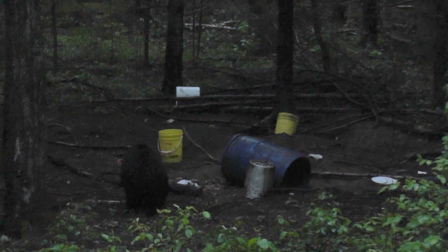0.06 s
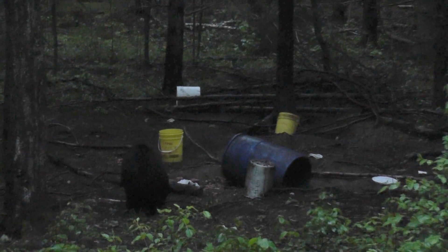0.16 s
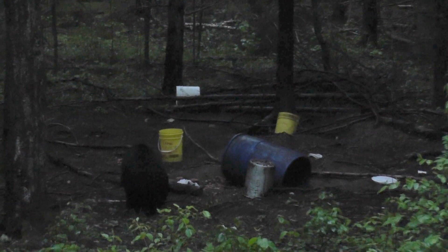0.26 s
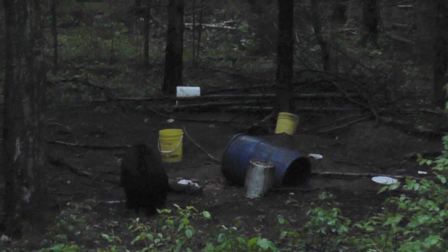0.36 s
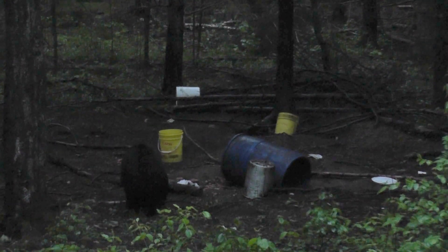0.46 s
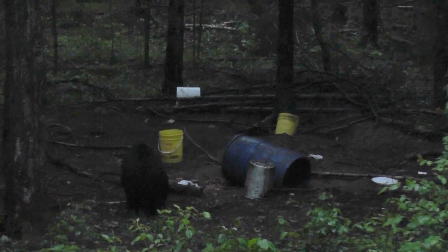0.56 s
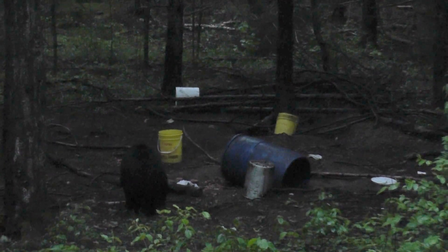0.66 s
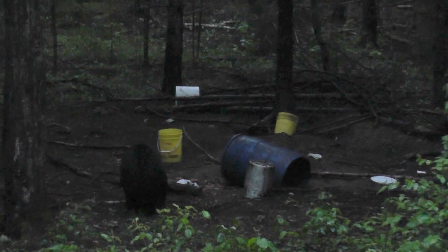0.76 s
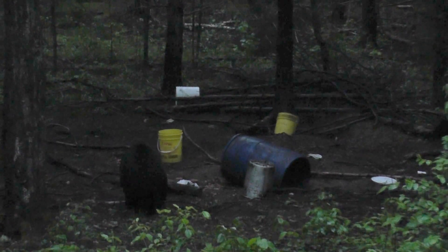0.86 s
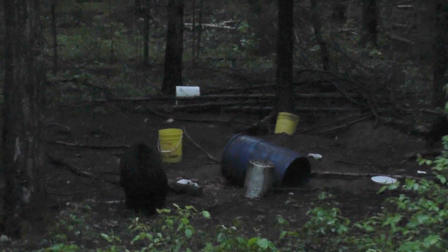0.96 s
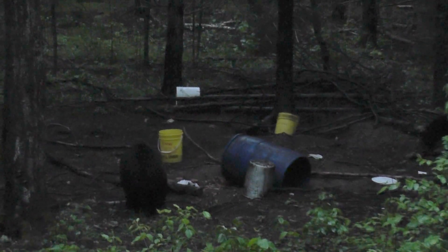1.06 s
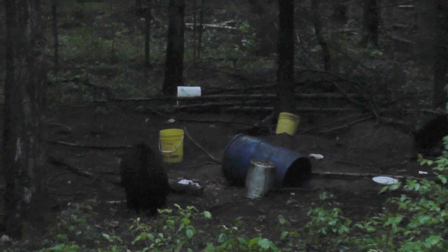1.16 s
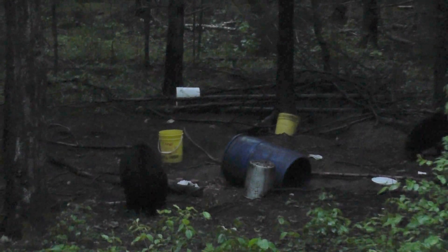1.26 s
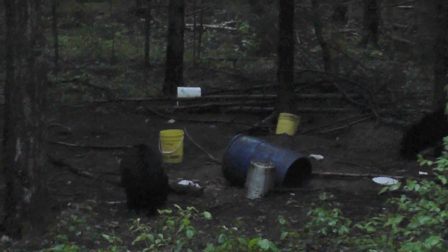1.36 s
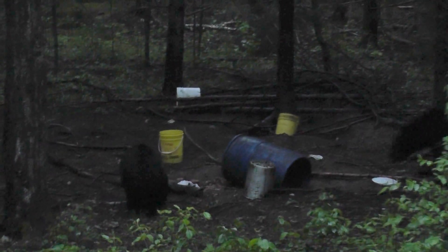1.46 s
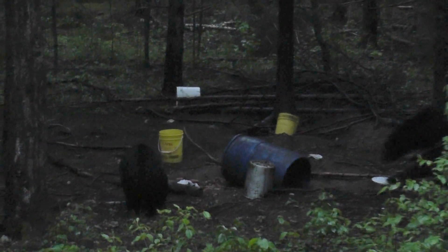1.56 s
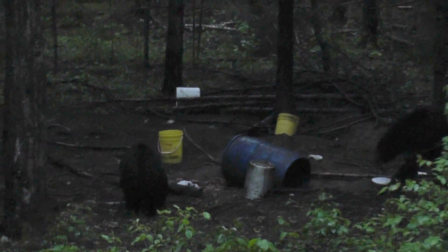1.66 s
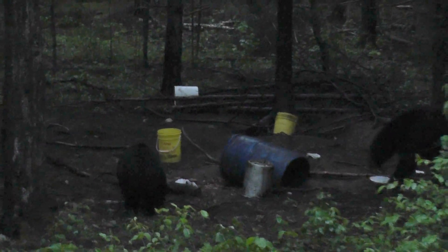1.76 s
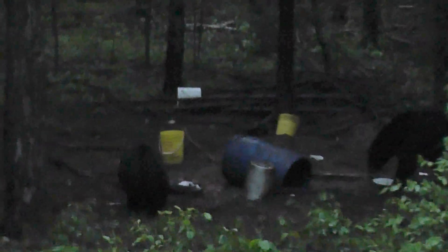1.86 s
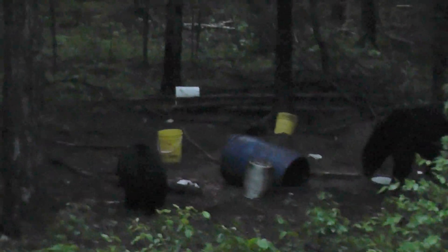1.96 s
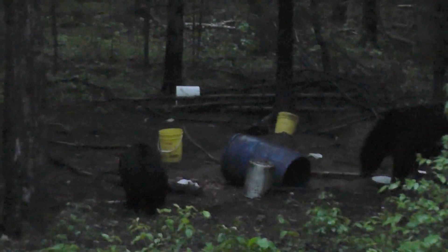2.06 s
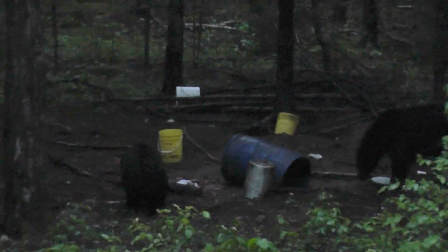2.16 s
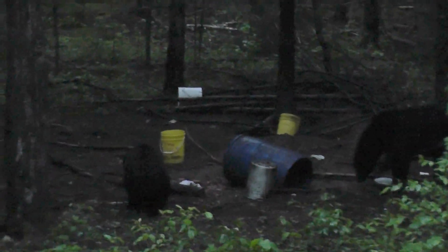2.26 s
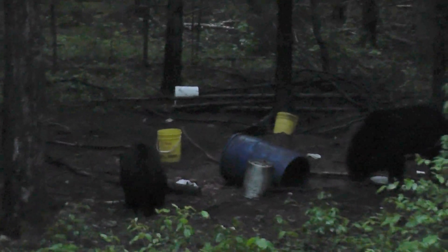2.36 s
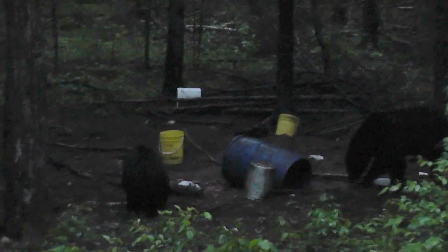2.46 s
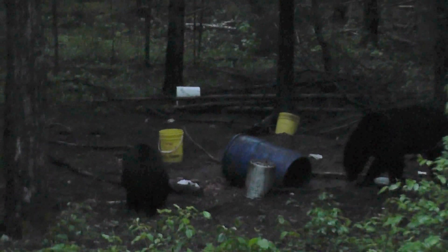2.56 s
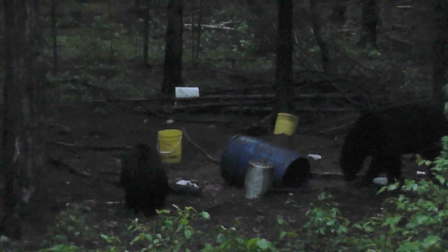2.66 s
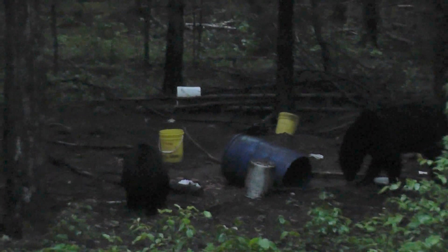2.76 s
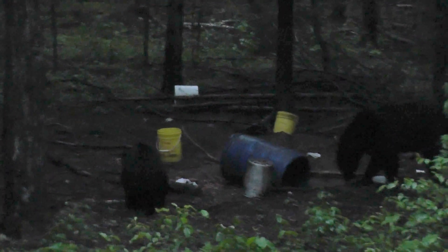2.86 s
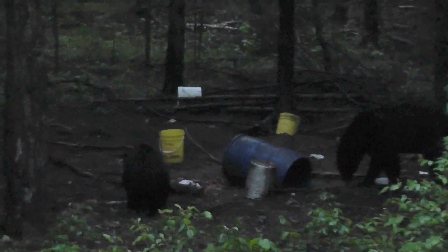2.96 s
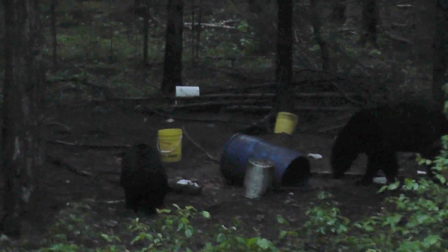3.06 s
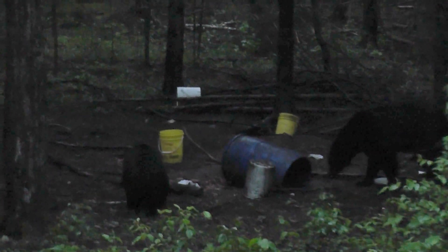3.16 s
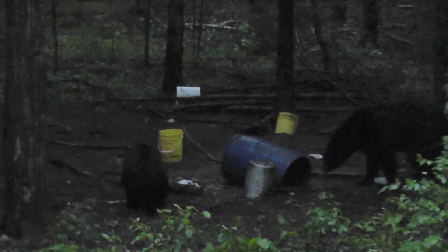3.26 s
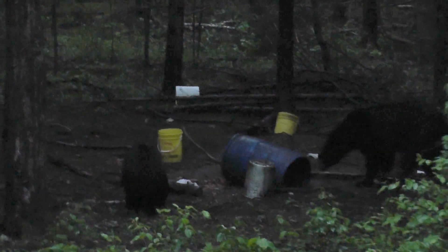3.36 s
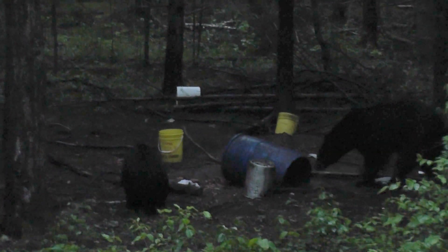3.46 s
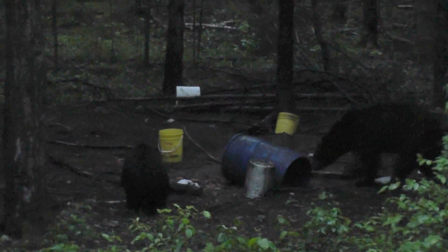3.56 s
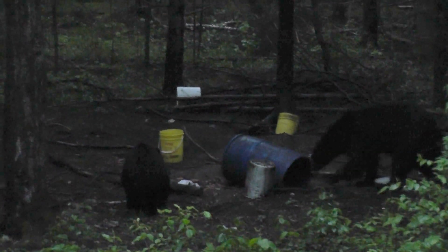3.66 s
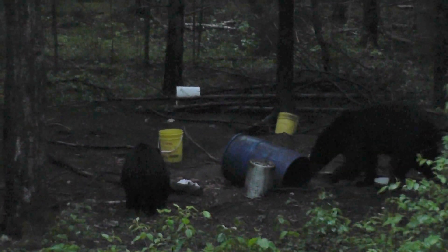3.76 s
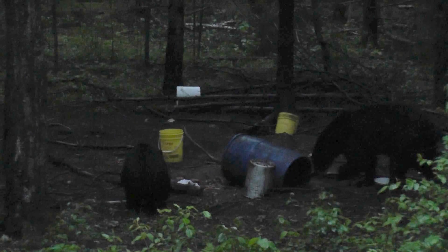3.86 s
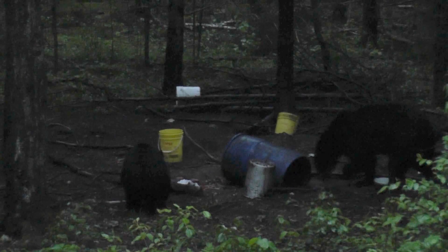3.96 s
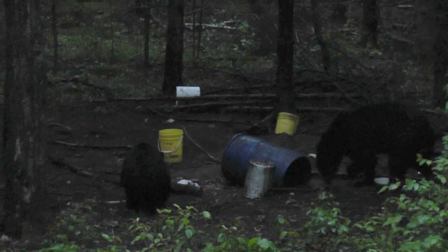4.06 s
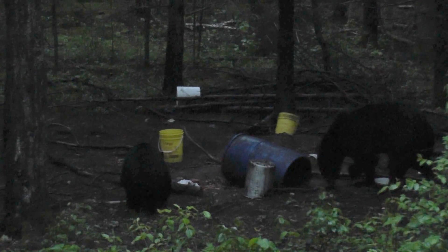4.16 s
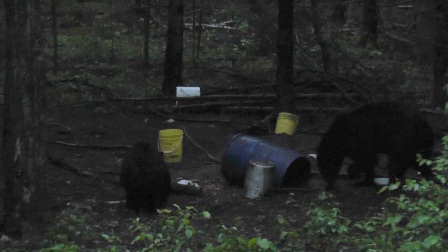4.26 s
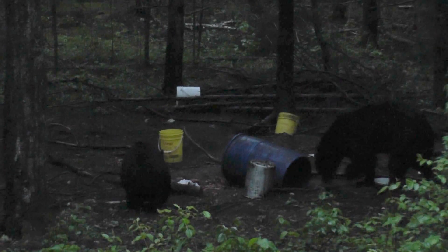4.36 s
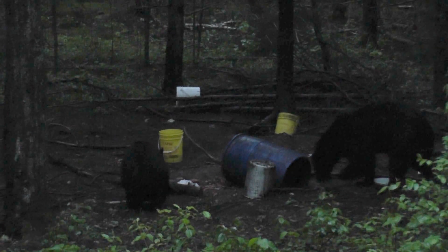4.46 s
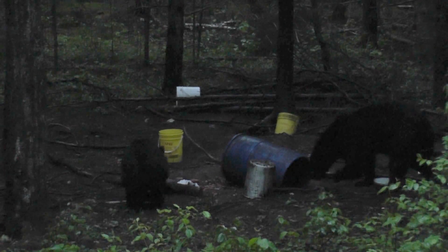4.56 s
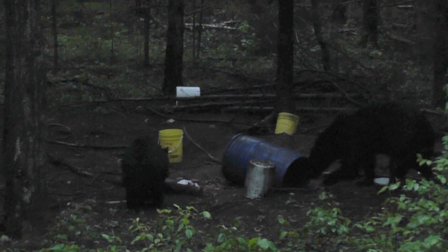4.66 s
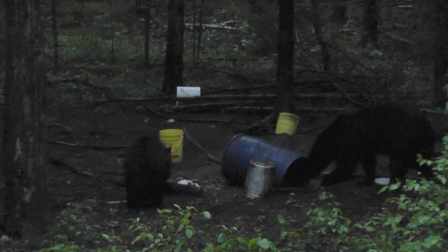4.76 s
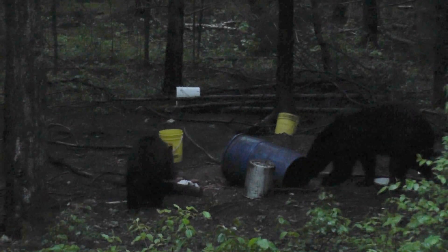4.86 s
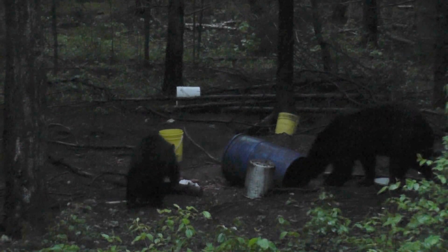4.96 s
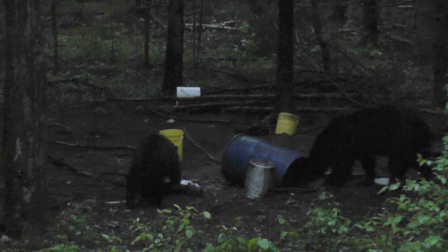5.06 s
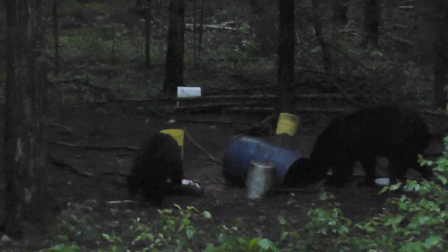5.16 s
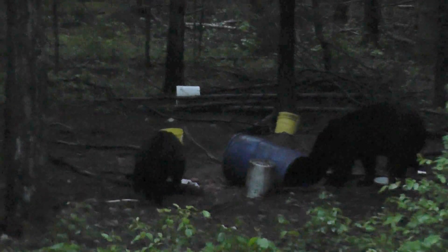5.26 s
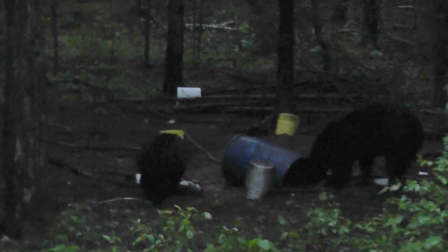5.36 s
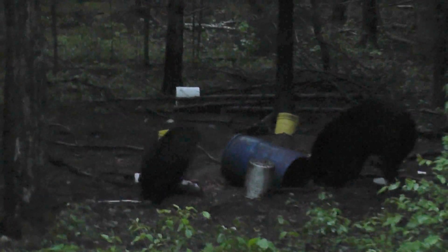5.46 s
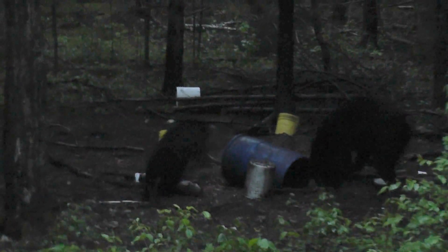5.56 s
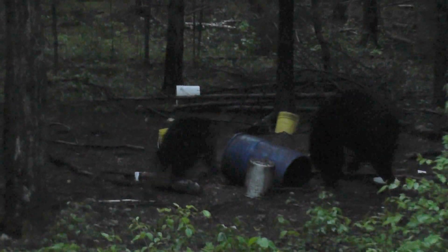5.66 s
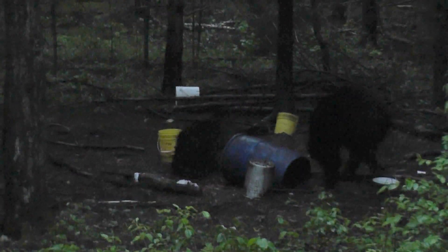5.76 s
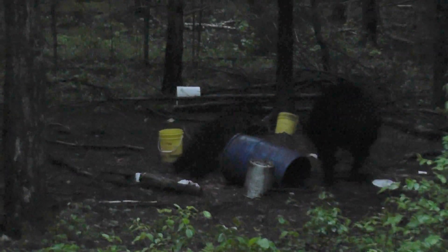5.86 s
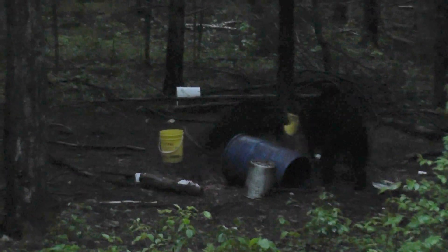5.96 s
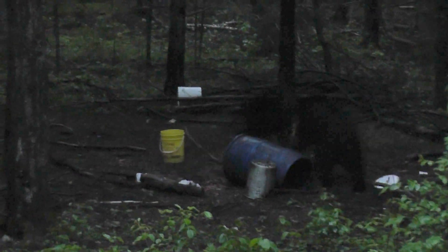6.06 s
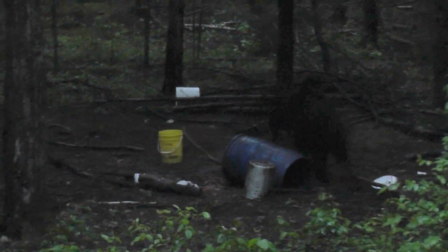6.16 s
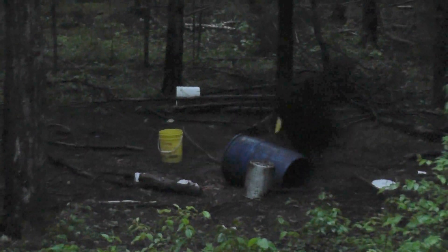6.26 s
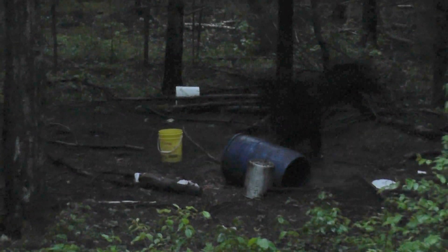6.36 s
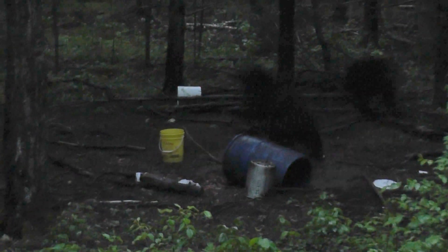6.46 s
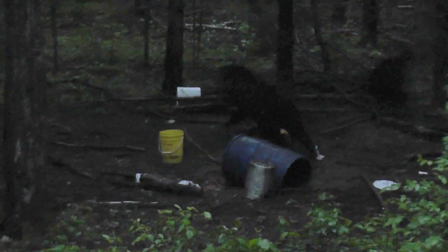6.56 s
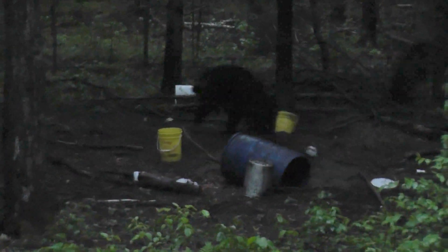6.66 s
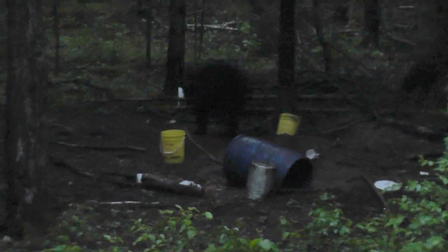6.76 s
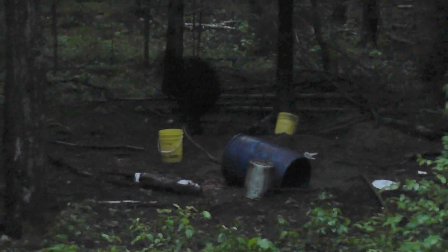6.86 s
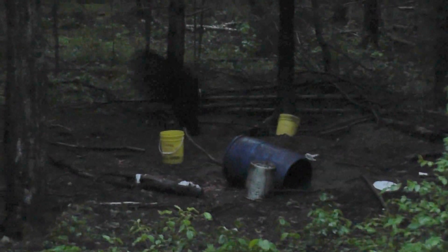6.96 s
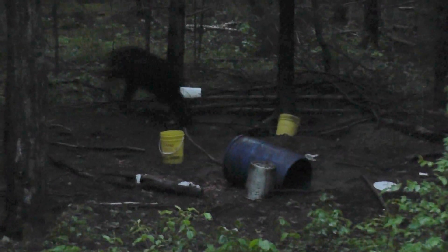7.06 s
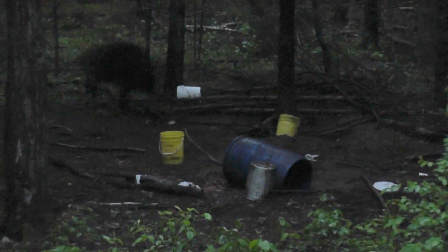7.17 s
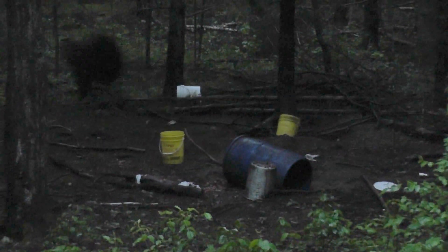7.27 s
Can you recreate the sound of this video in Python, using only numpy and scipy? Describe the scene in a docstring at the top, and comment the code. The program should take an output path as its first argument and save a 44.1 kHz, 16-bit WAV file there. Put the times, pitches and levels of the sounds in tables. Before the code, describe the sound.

For five seconds the forest is hushed, with drips on leaves, soft plant rustles, light wooden clacks and a low engine drone far off. A close bow shot breaks it with a short hiss and hard slam, followed by the arrow's smack. Paws pound and litter scuffs, a barrel thumps and booms, then a run of dry branch cracks rings through the woods until the end.

```python
"""A bow is shot from a hide in damp woods: a hiss, the slam of string and limbs, then the arrow's smack.
Bears bolt, bump a plastic barrel and break through brush and dead wood, while the trees answer.
Before that, drops tick on leaves and hide; under it all, leaves hiss and a far engine rises and falls.
Impacts are decaying noise and damped modes, rustles are grainy coloured noise, the engine is a sum of
harmonics, and the echoes of hide and woods are diffuse noise tails."""
import sys
import numpy as np
from scipy import signal
from scipy.fft import rfft, irfft, next_fast_len
from scipy.io import wavfile
from scipy.ndimage import map_coordinates

SR = 44100
rng = np.random.default_rng(int(sys.argv[2]) if len(sys.argv) > 2 else 0)


def dump(signal):
    """Clip the signal to [-1, 1] and save it as 16-bit WAV at the path in sys.argv[1]."""
    limited = np.clip(np.atleast_2d(signal).T, -1, 1)
    pcm = np.round(limited * 32767).astype(np.int16)
    wavfile.write(sys.argv[1], SR, pcm)


N = 322812

# reverberation inside the hide: (frequency [Hz], t60 [s])
HIDE_DECAY = [(150, 0.09), (600, 0.24), (1600, 0.26), (3000, 0.08), (8000, 0.18), (15000, 0.19)]
# reverberation among the trees: (frequency [Hz], t60 [s])
WOODS_DECAY = [(100, 0.099), (700, 1), (3000, 0.73), (8000, 0.65), (15000, 0.37)]
# spectrum of brushed twigs: (frequency [Hz], relative level [dB])
BRUSH_SPECTRUM = [(1350, -51), (2300, -13), (3620, -2.5), (4550, -18), (5140, -0.5), (5940, -4.5),
                  (7460, 5), (8430, 0.5), (12900, -21.5), (15000, -20), (16000, -31)]
# spectrum of rustling leaves: (frequency [Hz], relative level [dB])
LEAF_SPECTRUM = [(880, -9), (1500, 0), (2160, -16), (2590, -5), (3090, -6.5), (3880, -8), (4690, -13.5),
                 (7030, -4), (8000, -5.5), (10500, -19), (11800, -19.5), (14300, -24), (16000, -27)]
# spectrum of a drop's tick: (frequency [Hz], relative level [dB])
TICK_SPECTRUM = [(500, -16), (1500, -9), (3200, 0.5), (4700, -7.5), (7500, 2), (10500, -13.5), (16000, -37)]

TOP_HZ = 16000  # upper band limit
RUN_S = 5.4  # from here on the bears run


def amp(db):
    """Decibels as an amplitude factor."""
    return 10 ** (np.asarray(db) / 20)


def unit(x):
    """x scaled to an rms of 1."""
    return x / np.sqrt(np.mean(x ** 2) + 1e-20)


def along(points, hz):
    """Read (frequency [Hz], value) points on a log frequency axis."""
    f, v = np.transpose(points)
    return np.interp(np.log(hz + 1), np.log(f + 1), v)


def curves(rows):
    """One value per sample for each column after the time."""
    s, *cols = np.transpose(rows)
    return [np.interp(np.arange(N) / SR, s, c) for c in cols]


def wobble(rate):
    """A smooth random curve with rate knots a second."""
    knots = rng.standard_normal(int(N * rate / SR) + 4)
    return map_coordinates(knots, [np.arange(N) * rate / SR])


def swell(s, attack, hold, fall_db_per_s):
    """An envelope that rises from s seconds on, holds and dies away."""
    t = np.arange(N) / SR - s
    fall_db = -fall_db_per_s * np.maximum(t - attack - hold, 0)
    return np.clip(t / attack, 0, 1) * amp(fall_db)


def filtered(x, response):
    """x times a response of frequency."""
    m = next_fast_len(N + SR // 2)
    return irfft(rfft(x, m) * response(np.fft.rfftfreq(m, 1 / SR)), m)[..., :N]


def coloured(x, spectrum, size=2048):
    """x through a causal, minimum-phase filter of unit energy with the given spectrum."""
    level_db = np.maximum(along(spectrum, np.fft.rfftfreq(size, 1 / SR)), -90)
    cepstrum = irfft(np.log(amp(level_db)))
    # folding the cepstrum forward puts the filter's energy as early as possible
    cepstrum[1:size // 2] *= 2
    cepstrum[size // 2 + 1:] = 0
    kernel = irfft(np.exp(rfft(cepstrum)))
    return signal.fftconvolve(x, kernel / np.linalg.norm(kernel))[:N]


def spread(pair):
    """Two unrelated signals become left and right, as alike as diffuse sound is at the microphone."""
    # left-right likeness: (frequency [Hz], correlation [-1 to 1])
    likeness = [(50, .05), (100, 0.2), (160, 0.8), (400, 0.7), (1300, 0.8), (3500, 0.98), (8000, 0.94),
                (15000, 0.24)]

    def turn(hz):
        return np.arccos(np.clip(along(likeness, hz), -1, 1)) / 2

    mid, side = filtered(pair, lambda hz: np.array([np.cos(turn(hz)), np.sin(turn(hz))]))
    return np.array([mid + side, mid - side])


def rush(spectrum, grain_db, grain_rate):
    """Stereo noise of rms 1 that comes in grains of random size."""
    grains = rng.standard_normal((2, N)) * amp(grain_db * wobble(grain_rate))
    return unit(spread(filtered(grains, lambda hz: amp(along(spectrum, hz)))))


def fade(t60):
    """Half a second of exponential decay, 60 dB down after t60 seconds."""
    return np.exp(-np.log(1000) * np.arange(SR // 2) / SR / t60)


def burst(t60):
    """Noise that starts at once and dies away."""
    return rng.standard_normal(SR // 2) * fade(t60)


def ring(modes, scatter_db):
    """Damped sine modes, struck at slightly new strengths each time."""
    t = np.arange(SR // 2) / SR
    total = np.zeros(SR // 2)
    for hz, db, t60 in modes:
        strength = amp(db + scatter_db * rng.normal())
        total += strength * np.sin(2 * np.pi * hz * t) * fade(t60)
    return total


def add(track, s, sound):
    """Mix a sound into a track at s seconds."""
    part = track[round(s * SR):][:len(sound)]
    part += sound[:len(part)]


def echo(x, decay, delay):
    """A diffuse stereo tail in which each frequency dies at its own speed."""
    hz, t, z = signal.stft(rng.standard_normal((2, SR)), SR, nperseg=256)
    dying = z * np.exp(-np.log(1000) * t / along(decay, hz)[:, None])
    tail = signal.istft(dying, SR, nperseg=256)[1]
    late = np.pad(x, (int(delay * SR), 0))[None]
    return spread(signal.fftconvolve(late, tail / np.linalg.norm(tail[0]), axes=1)[:, :N])


def bow():
    """The arrow hisses over its rest, then the string slams to a stop and the limbs shudder."""
    # jolts of the bow: (time [s], crack level [dB], thud level [dB])
    jolts = [(5.1107, -19.5, -45), (5.1129, -18, -42), (5.1157, -13, -28), (5.1189, -33, -11),
             (5.1242, -23.5, -14.5), (5.131, -20.5, -23), (5.1373, -34, -22), (5.165, -40, -37)]
    # spectrum of hiss and crack: (frequency [Hz], relative level [dB])
    crack_spectrum = [(200, -18), (600, 5), (1000, -6), (1700, -3), (2250, -12), (2800, -5), (3800, -8),
                      (4600, -15.5), (5900, -4), (7800, -2.5), (10000, -14), (16000, -26)]
    # dull knock of the grip: (frequency [Hz], level [dB], t60 [s])
    grip_modes = [(253, -14, 0.0041), (520, -0.5, 0.0057), (890, -1, 0.0053)]
    # shuddering limbs: (frequency [Hz], level [dB], t60 [s])
    limb_modes = [(143.6, -13, 0.045), (275, -13.5, 0.081), (615, -3.5, 0.042), (584, -17, 0.13),
                  (785, -28, .13), (1370, -30, .14), (1560, -28, 0.11), (1660, -21, 0.14)]
    release_s, release_db, release_t60_s = 5.0946, -26, 0.14
    jolt_t60_s = 0.032
    string_stop_s = 5.1153
    rattle, body = np.zeros((2, N)), np.zeros(N)
    for channel in rattle:
        add(channel, release_s, amp(release_db) * burst(release_t60_s))
    for s, crack_db, thud_db in jolts:
        for channel in rattle:
            add(channel, s, amp(crack_db) * burst(jolt_t60_s))
        add(body, s, amp(thud_db) * ring(grip_modes, scatter_db=1))
    add(body, string_stop_s, amp(-11) * ring(limb_modes, scatter_db=1))
    crack = spread(np.array([coloured(channel, crack_spectrum) for channel in rattle]))
    shot = crack + coloured(body, [(50, -25), (170, -2)])
    # the hide's cloth returns the crack with a lift in the lows and around 1.6 kHz
    returned = coloured(crack[0], [(150, 12), (600, 2.0), (1600, 7.0), (2600, 2.5), (8000, -5)])
    right_of_centre = amp([[-3.2], [2.3]])
    near = shot * right_of_centre + amp(-11.5) * echo(returned, HIDE_DECAY, delay=0.02)
    return near + amp(-20) * echo(crack[0], WOODS_DECAY, delay=0.037)


def arrow():
    """The arrow's hard smack and rattle are noise bursts; trees and hide return them, the hide brightly."""
    # strike and rattles: (time [s], level [dB], t60 [s])
    hits = [(5.3731, -20.5, 0.018), (5.375, -16.5, 0.019), (5.382, -25.5, 0.042), (5.3868, -26.5, 0.042)]
    # spectrum of the strike: (frequency [Hz], relative level [dB])
    strike_spectrum = [(60, -21), (170, 4.5), (500, 4.5), (1400, -2), (2300, -11.5), (3500, -10),
                       (4600, -18.5), (7600, -0.5), (10000, -16), (16000, -30)]
    blows = np.zeros(N)
    for s, db, t60 in hits:
        add(blows, s, amp(db) * burst(t60))
    smack = coloured(blows, strike_spectrum)
    trees = amp(-8.0) * echo(smack, WOODS_DECAY, delay=.01)
    bright = coloured(blows, BRUSH_SPECTRUM)
    return smack + trees + amp(-10.5) * echo(bright, HIDE_DECAY, delay=0.012)


def barrel():
    """A bear's bump rattles and rings the plastic wall; the air inside booms a moment later."""
    # bumps: (time [s], ring level [dB], rattle level [dB], rattle t60 [s])
    knocks = [(5.9448, -17, -18.5, 0.12), (6.085, -42, -45, 0.25)]
    # modes of the wall: (frequency [Hz], level [dB], t60 [s])
    wall_modes = [(163, -11.5, 0.19), (207, -13, 0.21), (322, -13, 0.19), (451.6, -4, 0.17),
                  (704, -6.5, 0.15), (786, 4.5, 0.043), (1305, -10, 0.054)]
    # air in the barrel: (frequency [Hz], level [dB], t60 [s])
    air_modes = [(92, 8, 0.096)]
    # the wall's dense upper modes: (frequency [Hz], relative level [dB])
    shell_spectrum = [(50, -32), (200, 2.5), (550, 6), (850, 3), (1050, -7.5), (1400, -5.5), (2400, -21),
                      (5000, -36), (9000, -62)]
    wall, rattle = np.zeros((2, N))
    for s, db, rattle_db, t60 in knocks:
        # 1 - fade softens each onset
        add(wall, s, amp(db) * ring(wall_modes, scatter_db=1) * (1 - fade(.004)))
        add(wall, s + 0.0078, amp(db) * ring(air_modes, scatter_db=.5) * (1 - fade(0.18)))
        add(rattle, s, amp(rattle_db) * burst(t60))
    thump = coloured(wall, [(35, -22), (85, 1)]) + coloured(rattle, shell_spectrum)
    return thump + amp(-17) * echo(thump, WOODS_DECAY, delay=.015)


def flight():
    """With each bound, paws pound the soil, scuff through litter and sweep the undergrowth."""
    # bounds: (time [s], length of the push [s], soil level [dB], litter level [dB], twigs level [dB])
    bounds = [(5.38, 0.021, -49, -49, -45.5), (5.541, 0.13, -49, -40.5, -49), (5.72, .02, -50, -49, -68),
              (6.02, 0.11, -45.5, -51.5, -56), (6.32, 0.086, -48, -51.5, -55),
              (6.66, 0.028, -50, -50, -43.5), (6.95, .01, -55, -70, -54)]
    # spectrum of pounded soil: (frequency [Hz], relative level [dB])
    soil_spectrum = [(21, -51), (35, -25), (161, -6), (190, -8), (218, 3), (254, -15), (451, 1),
                     (826, -5.5), (990, -12), (1300, -8), (1690, -56), (2860, -120)]
    # spectrum of scuffed litter: (frequency [Hz], relative level [dB])
    litter_spectrum = [(470, -37), (800, 4), (999, -11.5), (1360, 3.5), (3040, -13), (4060, -9.5),
                       (4560, -24), (5000, -17), (6500, -48), (11000, -120)]
    run_db = [[-49], [-56.5], [-54.5]]  # stir of running in soil, litter, twigs
    attack_s, fall_db_per_s = 0.024, 63  # each push builds up, then the ground cover settles
    running = swell(RUN_S, attack=0.11, hold=0, fall_db_per_s=2.0)
    power = (amp(run_db) * running) ** 2
    for s, length, *levels_db in bounds:
        push = swell(s, attack_s, length, fall_db_per_s)
        power += np.outer(amp(levels_db), push) ** 2
    soil, litter, twigs = np.sqrt(power)
    return (soil * rush(soil_spectrum, grain_db=3.5, grain_rate=95)
            + litter * rush(litter_spectrum, grain_db=1.5, grain_rate=120)
            + twigs * rush(BRUSH_SPECTRUM, grain_db=2.0, grain_rate=430))


def sticks(ring_t60=0.0085):
    """Each stick gives way with a crack, a very short ring and a spray of splinters, and the trees answer."""
    # dead sticks break: (time [s], level [dB], pitch [Hz], ring level relative to the snap [dB])
    snap_events = [(2.1008, -33, 3650, -0.5), (5.6914, -23.5, 1850, -11), (6.0143, -27.5, 3767, -10),
                   (6.4975, -10.5, 3450, -13.5), (6.5399, -13.5, 4070, -13.5), (6.5884, -23.5, 2790, -14),
                   (6.6555, -21.5, 3680, -14.5), (6.7131, -17.5, 3300, -14), (6.7344, -20.5, 2440, -14.5),
                   (6.9628, -21.5, 3260, -20.5), (7.0242, -27.5, 3062, -16), (7.119, -25.5, 4080, -21),
                   (7.206, -13, 1736, -14), (7.2515, -23.5, 3070, -15)]
    # spectrum of breaking wood: (frequency [Hz], relative level [dB])
    stick_spectrum = [(300, -59), (1000, -10), (2000, -6.5), (3300, -5), (4700, -9), (6200, 1.5),
                      (7800, 4.5), (10000, -8), (16000, -23.5)]
    break_db, splinter_db = -3.5, -16  # relative to the snap's level
    twigs_per_s, twig_db = 7, -36.5  # small twigs break at random under the running bears
    cracks, wood = np.zeros((2, N))
    for s, db, hz, ring_db in snap_events:
        split = amp(break_db) * burst(0.0042) + amp(splinter_db) * burst(0.056)
        add(cracks, s, amp(db) * split)
        modes = [(0.823 * hz, -3, ring_t60), (hz, 0, ring_t60), (1.155 * hz, -4, ring_t60)]
        add(wood, s, amp(db + ring_db) * ring(modes, scatter_db=0.5))
    run_length = N / SR - RUN_S
    for when in rng.random(round(twigs_per_s * run_length)):
        add(cracks, RUN_S + when * run_length, amp(twig_db) * burst(0.012))
    snaps = coloured(cracks, stick_spectrum)
    return snaps + wood + amp(-4.0) * echo(snaps, WOODS_DECAY, delay=.004)


def tube():
    """A kicked tube's hollow note stutters along the ground, sinking where it is pressed hardest."""
    # scrapes: (time [s], length [s], pitch before sagging [Hz], level [dB])
    scrapes = [(5.465, 0.167, 546, -40.5), (5.746, .11, 446.5, -45)]
    sag = 0.176  # share by which the note sinks in the middle of a scrape
    t, note = np.arange(N) / SR, np.zeros(N)
    for s, length, hz, db in scrapes:
        pressure = np.abs(np.sin(np.pi * np.clip((t - s) / length, 0, 1)))
        phase = 2 * np.pi * np.cumsum(hz * (1 - sag * pressure)) / SR
        level = np.sqrt(pressure) * amp(db + 2.2 * wobble(60))
        note += level * np.sin(phase + 0.9 * wobble(90))
    return note


def clacks():
    """A trodden branch knocks against its neighbour and rings very briefly in three modes."""
    # dead wood under paws: (time [s], pitch [Hz], level [dB])
    knocks = [(1.92, 1500, -46.5), (3.2893, 794, -37.5), (3.87, 794, -35), (3.927, 1161, -38.5),
              (4.5404, 1249, -36.5), (5.624, 320, -34.5), (5.723, 797, -32.5), (6.0865, 1360, -30),
              (7.001, 1255, -36.5)]
    wood = np.zeros(N)
    for s, hz, db in knocks:
        modes = [(hz, 0, .022), (1.43 * hz, -5, .014), (2.28 * hz, -9, .009)]
        add(wood, s, amp(db) * ring(modes, scatter_db=2.5))
    return wood + amp(-19) * echo(wood, WOODS_DECAY, delay=.006)


def footfalls():
    """The soft ground gives a dull, damped thud under a landing bear."""
    # heavy footfalls: (time [s], level [dB])
    landings = [(6.088, -46), (6.291, -50), (7.001, -42.5), (7.035, -44)]
    # modes of the forest floor: (frequency [Hz], level [dB], t60 [s])
    ground_modes = [(58, -8, 0.08), (106, 1, 0.079), (190, 2, .04)]
    ground = np.zeros(N)
    for s, db in landings:
        soft_onset = 1 - fade(.02)
        add(ground, s, amp(db) * ring(ground_modes, scatter_db=1) * soft_onset)
    return ground


def drops():
    """Drops tick and tap on leaves; the heavy ones ring the taut cloth of the hide."""
    # drops on leaves: (time [s], tick level [dB], hollow tap level [dB])
    leaf_drops = [(0.0573, -38.5, -40), (0.4103, -38, -34), (0.4237, -42, -43.5), (1.276, -33, -48),
                  (1.3159, -38.5, -47), (3.5107, -40, -64), (3.678, -41, -35.5), (3.927, -42, -41.5),
                  (4.0522, -38, -45), (4.4277, -39.5, -61), (4.592, -36, -39.5), (4.6501, -43, -46)]
    # spectrum of the hollow tap: (frequency [Hz], relative level [dB])
    tap_spectrum = [(250, -14), (700, -0.5), (1600, 2.5), (2300, -11.5), (3200, -6), (5000, -32)]
    # heavy drops on cloth: (time [s], level [dB])
    heavy_drops = [(1.7728, -24.5), (3.7034, -7.5)]
    # modes of the cloth: (frequency [Hz], level [dB], t60 [s])
    cloth_modes = [(335, -12, 0.036), (615, -12, 0.027), (770, 8.5, 0.0092), (1047, -13, 0.019),
                   (1493, -3.5, 0.0089)]
    ticks, taps, plops = np.zeros((3, N))
    for s, tick_db, tap_db in leaf_drops:
        add(ticks, s, amp(tick_db) * burst(0.0093))
        add(taps, s, amp(tap_db) * burst(0.015))
    for s, db in heavy_drops:
        soft_onset = 1 - fade(.009)
        add(plops, s, amp(db) * ring(cloth_modes, scatter_db=.5) * soft_onset)
        add(ticks, s, amp(db - 10) * fade(0.00042))
    patter = coloured(ticks, TICK_SPECTRUM) + coloured(taps, tap_spectrum)
    right_of_centre = amp([[-1], [1]])
    cloth = coloured(plops, [(60, -34), (350, 9)]) * right_of_centre
    return patter + amp(-13.5) * echo(patter, HIDE_DECAY, delay=.004) + cloth


def swish():
    """Cloth brushes briefly near the microphone; farther off, plants rustle along a walking bear."""
    # a bear wades through low plants: (time [s], level [dB])
    steps = [(2.41, -52.5), (2.54, -60), (2.62, -53), (2.689, -56.5)]
    # spectrum of brushed cloth: (frequency [Hz], relative level [dB])
    fabric_spectrum = [(290, -42), (500, -13), (576, -34), (823, 2), (990, -18), (1260, 2.5), (1390, -7),
                       (2570, -17), (2880, -12.5), (4470, -20.5), (8370, -8.5), (10200, -25), (15000, -36)]
    stroke = amp(-36) * swell(1.772, attack=0.014, hold=0.015, fall_db_per_s=422)
    wading = np.zeros(N)
    for s, db in steps:
        wading += amp(db) * swell(s, attack=0.029, hold=0.0079, fall_db_per_s=125)
    cloth = stroke * rush(fabric_spectrum, grain_db=0.5, grain_rate=300)
    return cloth + wading * rush(LEAF_SPECTRUM, grain_db=3.5, grain_rate=190)


def drizzle(rate=15, db=-52, spread_db=4.0):
    """Faint drips fall from the canopy at random, rate a second, a few of them nearer than the rest."""
    drips = np.zeros(N)
    for when, chance in rng.random((round(rate * N / SR), 2)):
        nearness = min(-np.log(1 - chance), 3)
        add(drips, when * N / SR, amp(db + spread_db * nearness) * burst(0.0062))
    return coloured(drips, TICK_SPECTRUM)


def engine(flutter_db=1.45, fading_db=0.2):
    """Low harmonics, louder with speed; each flutters, fades and blurs on its way through the trees."""
    # engine speed: (time [s], firing rate [Hz])
    firing = [(0.0, 52.9), (0.19, 54.56), (1.11, 57.58), (1.52, 57.83), (1.73, 59.0), (2.17, 58.2),
              (2.69, 58.44), (3.23, 61.6), (3.62, 60.47), (3.98, 56.9), (4.09, 57.16), (4.8, 53.3),
              (5.0, 51.9), (6.2, 53.5), (7.032, 57.4), (7.32, 56.8)]
    # third to sixth harmonics: (relative level [dB], share of the engine's drop in level [ratio])
    harmonics = [(-10, 0.36), (2.5, 0.98), (-9, 0.55), (-17.5, 0.22)]
    full_load_hz, full_load_db = 58.95, -41.5  # no louder above this rate; base level of the harmonics
    # drop in level, before each harmonic takes its share
    load_db_per_hz, recede_db_per_s = 3, 1.0
    nearest_s = 1.8  # the engine passes closest
    hz, = curves(firing)
    slowing_db = load_db_per_hz * np.maximum(full_load_hz - hz, 0)
    distance_db = recede_db_per_s * np.abs(np.arange(N) / SR - nearest_s)
    drop_db = slowing_db + distance_db
    phase = 2 * np.pi * np.cumsum(hz) / SR
    hum = np.zeros(N)
    for k, (level_db, share) in enumerate(harmonics, 3):
        blur = .2 * wobble(20)  # radians
        waver_db = flutter_db * wobble(13) + fading_db * wobble(2.445)
        level = amp(full_load_db + level_db - share * drop_db + waver_db)
        hum += level * np.sin(k * phase + blur)
    return hum


def woods(drift_db=0.13):
    """A low murmur, and leaves hissing with countless tiny drips: grainy noise that drifts a little."""
    # spectrum of the murmur: (frequency [Hz], relative level [dB])
    murmur_spectrum = [(30, -36), (90, -20.5), (125, -14.5), (155, -8), (220, -3), (320, -4), (420, -9.5),
                       (700, -9), (1000, -21), (1500, -23), (2400, -36.5), (4000, -70)]
    murmur_db, hiss_db = -51.5, -61  # mean levels
    murmur = amp(murmur_db + drift_db * wobble(1.81)) * rush(murmur_spectrum, grain_db=1.5, grain_rate=15)
    hiss = amp(hiss_db + drift_db * wobble(3.15)) * rush(LEAF_SPECTRUM, grain_db=2.5, grain_rate=450)
    return murmur + hiss


def scene():
    """The shot, the bolting bears and the quiet woods together."""
    bears = barrel() + flight() + footfalls() + tube() + clacks() + sticks()
    quiet_woods = woods() + engine() + drizzle() + drops() + swish()
    return bow() + arrow() + bears + quiet_woods


def record(dry):
    """The microphone chain keeps nothing above its band limit."""
    return filtered(dry, lambda hz: hz < TOP_HZ)


dry = scene()
out = record(dry)
dump(out)
```